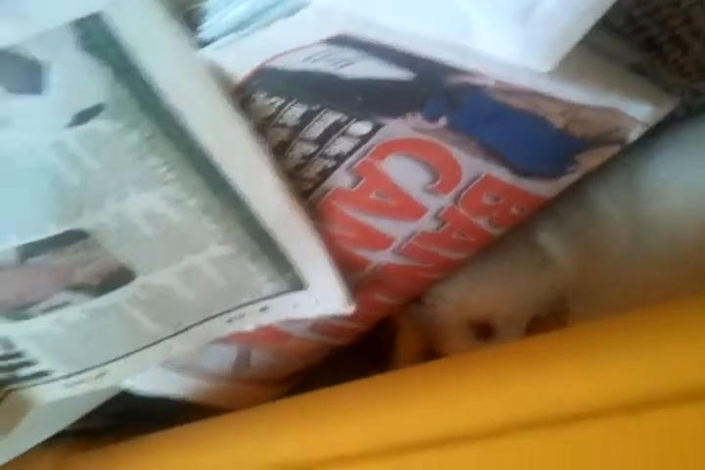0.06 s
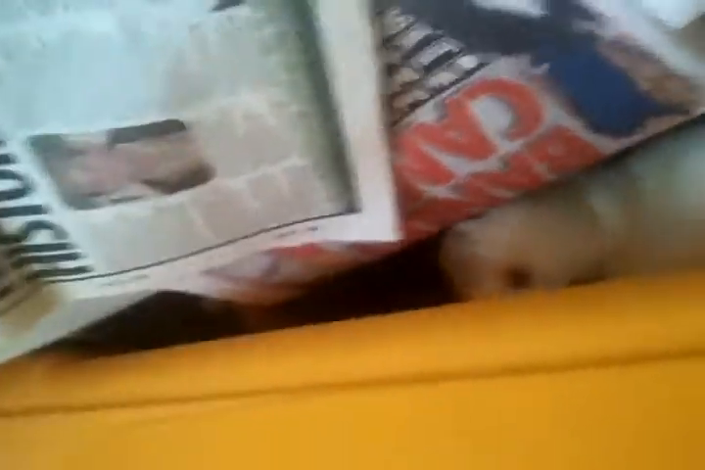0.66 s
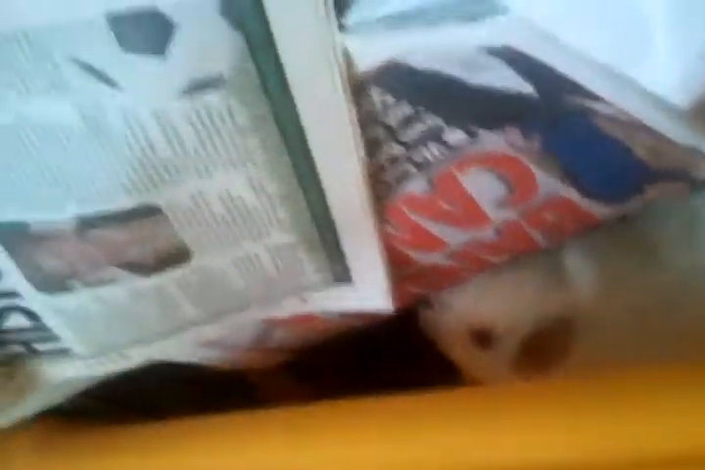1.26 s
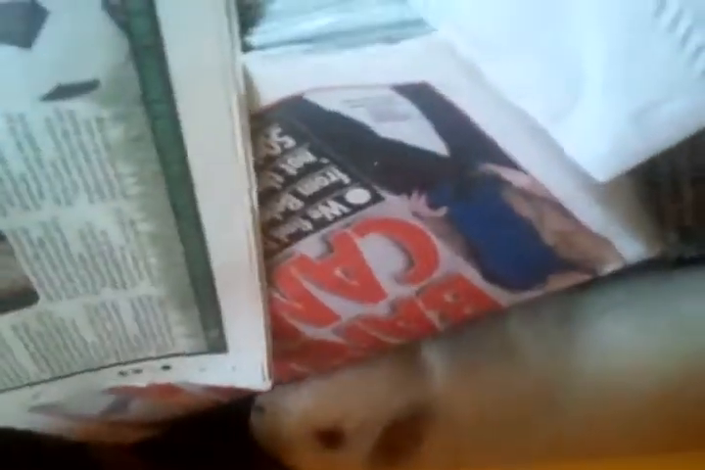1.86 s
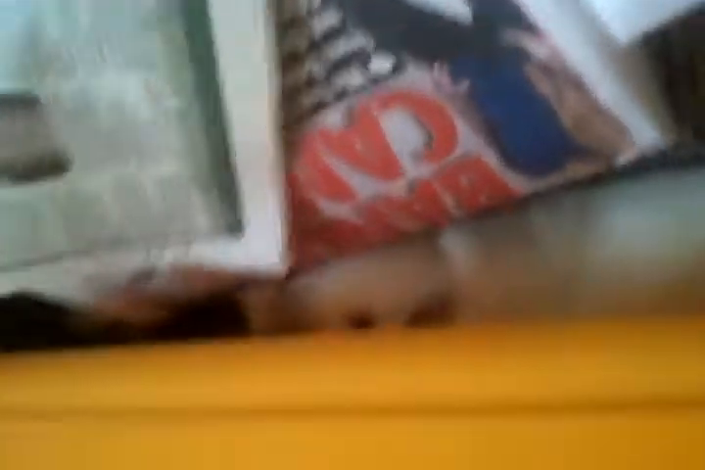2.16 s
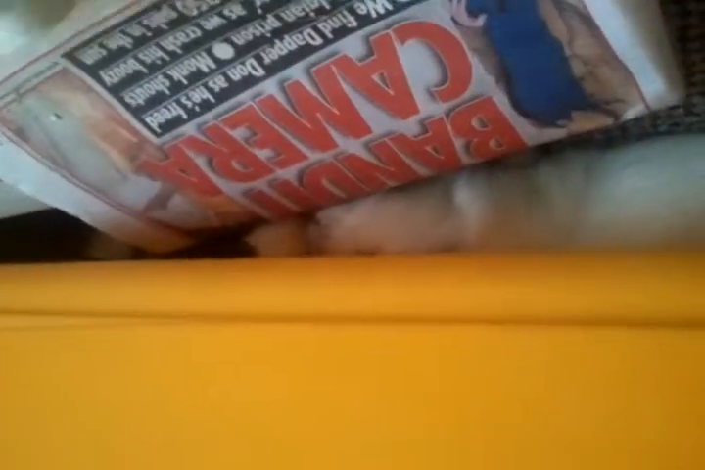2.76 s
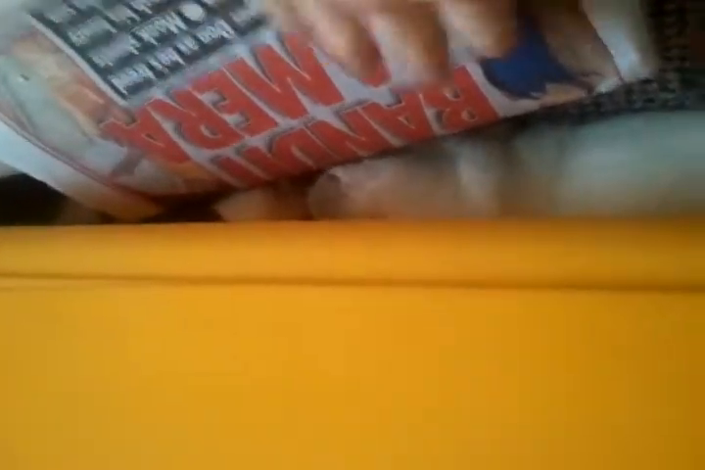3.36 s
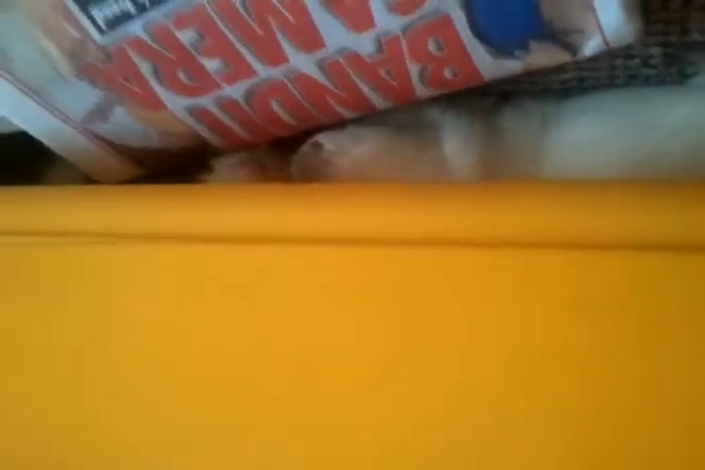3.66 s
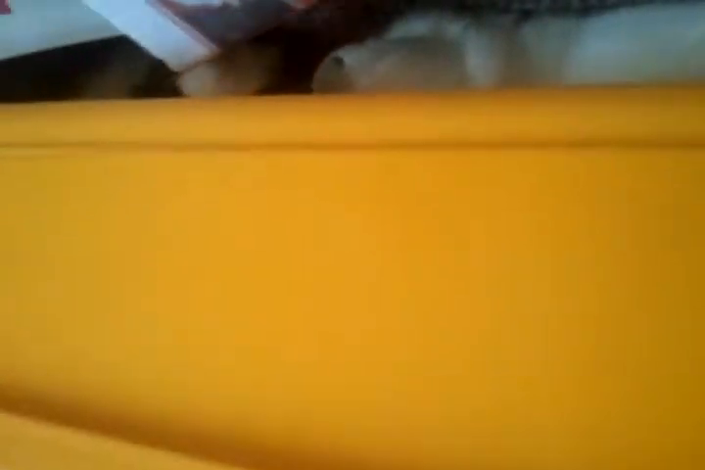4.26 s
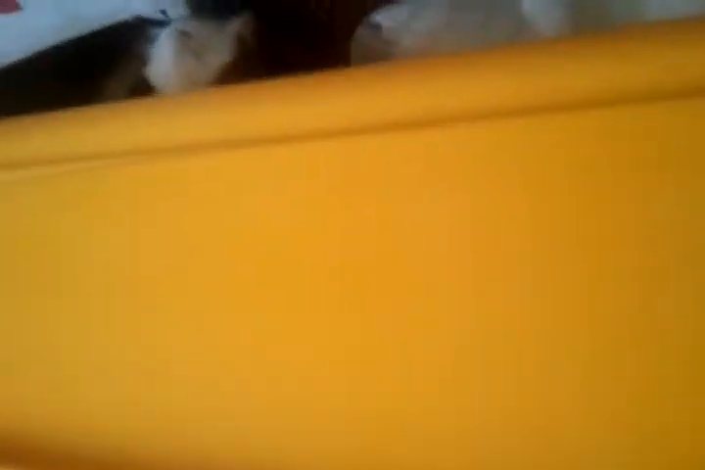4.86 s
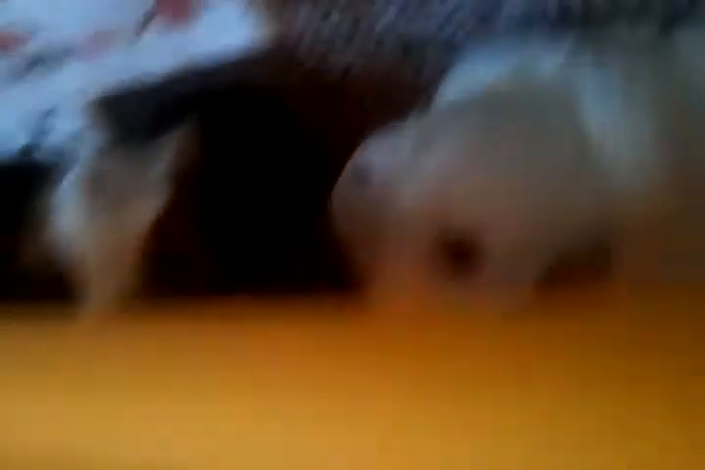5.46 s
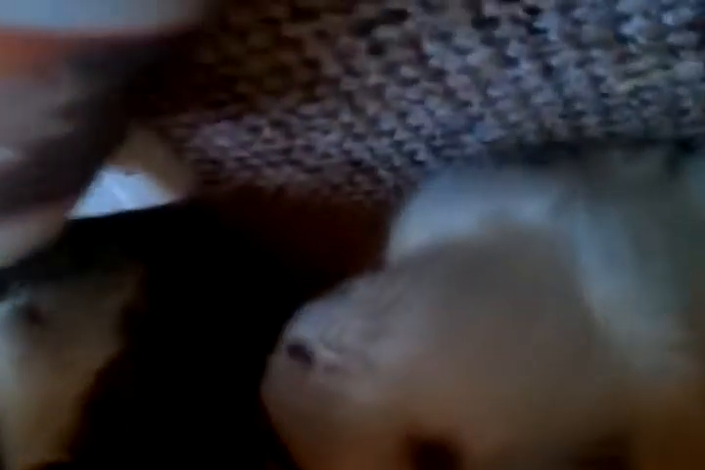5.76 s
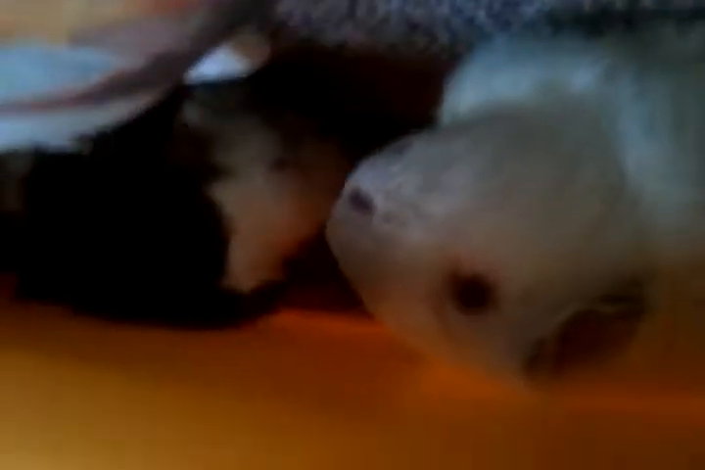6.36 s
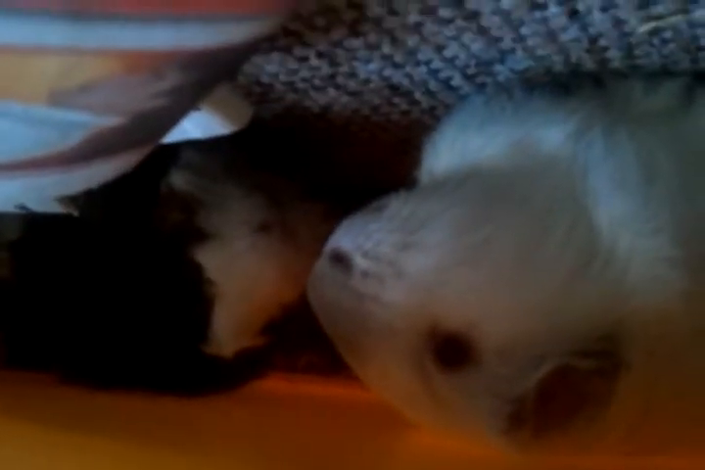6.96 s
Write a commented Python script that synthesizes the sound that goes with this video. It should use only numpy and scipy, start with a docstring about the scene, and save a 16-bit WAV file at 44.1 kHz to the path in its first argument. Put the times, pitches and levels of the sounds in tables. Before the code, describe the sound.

Newspaper rustles softly close to the microphone in a small, quiet room with a faint hum and hiss. The pages are dragged in uneven pulls, sheet sliding over sheet with a bright hiss, dotted with small pops and crease snaps. The rustling grows louder and crunchier, then a page briefly crumples with a few dull thuds from a sofa cushion, and everything settles.

```python
"""Newspaper rustles softly, close to the microphone, over the faint hum and hiss of a small room.
The top pages are being slowly dragged off guinea pigs that shelter under them on a sofa.
Sheet slides on sheet with a bright hiss, slack panels pop over, edges judder, folds crunch,
creases snap and the cushion gives a few dull thuds. Near the end a page crumples, then all settles."""
import sys
import numpy as np
from scipy import signal
from scipy.fft import rfft, irfft
from scipy.io import wavfile

SR = 44100
rng = np.random.default_rng(int(sys.argv[2]) if len(sys.argv) > 2 else 0)


def log_audio(samples):
    """Write samples as a 16-bit WAV file to the path given in sys.argv[1]."""
    # one column per channel
    frames = np.atleast_2d(samples).T
    # limit to full scale, then quantise
    limited = np.clip(frames, -1, 1)
    pcm = np.round(limited * 32767).astype(np.int16)
    wavfile.write(sys.argv[1], SR, pcm)


N = 318477
TIME = np.arange(N) / SR


def from_db(db):
    return 10 ** (np.asarray(db) / 20)


def rms_one(x):
    return x / np.sqrt(np.mean(x ** 2) + 1e-20)


def peak_one(x):
    return x / (np.abs(x).max() + 1e-20)


def butterworth(x, order, hz, kind="low"):
    return signal.sosfilt(signal.butter(order, hz, kind, fs=SR, output="sos"), x)


def add(out, s, sound):
    """Mix a short sound in at s seconds."""
    at = max(round(s * SR), 0)
    out[at:at + len(sound)] += sound[:max(N - at, 0)]


def drift(rate_hz):
    """A slow random wander of spread 1."""
    step, warm_up = 40, 2000
    r = np.exp(-2 * np.pi * rate_hz * step / SR)
    noise = rng.standard_normal(N // step + warm_up + 2)
    slow = signal.lfilter([1], [1, -2 * r, r * r], noise)[warm_up:]
    return np.interp(np.arange(N) / step, np.arange(len(slow)), rms_one(slow))


def coloured(x, spectrum):
    """Shape a steady sound by (Hz, dB) points, falling 41 dB an octave beyond them; rms 1."""
    hz, db = np.transpose(spectrum)
    octave, points = np.log2(np.arange(N // 2 + 1) * SR / N + 1), np.log2(hz)
    outside = np.abs(octave - np.clip(octave, points[0], points[-1]))
    gain = from_db(np.interp(octave, points, db) - 41 * outside)
    return rms_one(irfft(rfft(x) * gain, N))


def resonance(x, hz, width_hz):
    """One resonance of the sheet, gain 1 at its peak."""
    r = np.exp(-np.pi * width_hz / SR)
    feedback = [1, -2 * r * np.cos(2 * np.pi * hz / SR), r * r]
    return signal.lfilter(np.array([1, 0, -1]) * (1 - r * r) / 2, feedback, x)


def slips(per_s, spread_db):
    """Fibres catch and let go at random: many small clicks, a few large; rms 1."""
    sizes = from_db(spread_db * np.minimum(rng.exponential(1, N), 5))
    signs = rng.choice([-1, 1], N)
    return rms_one(sizes * signs * (rng.random(N) < per_s / SR))


def clusters(rows, clicks, relative_width):
    """Each cluster of slips swells and fades, ringing in one resonance of the paper."""
    out = np.zeros(N)
    for middle, db, half_length, hz in rows:
        near = np.abs(TIME - middle) < half_length
        swell = np.cos(np.pi / 2 * (TIME[near] - middle) / half_length) ** 2
        width_hz = relative_width * hz
        ringing = resonance(resonance(clicks[near], hz, width_hz), hz, width_hz)
        out[near] += from_db(db) * rms_one(ringing * swell) * np.sqrt(np.mean(swell ** 2))
    return out


def room_tone(hiss_db=-57):
    """The small room behind the sofa: even hiss and a few slightly unsteady hum lines."""
    # tones of the hum: (frequency [Hz], rms level [dB])
    hum_lines = [(91.5, -68), (823.6, -68.5), (1254, -81.5), (1378, -72.5), (2094, -70.5), (2169, -93)]
    # colour of the room's hiss: (frequency [Hz], relative level [dB])
    spectrum = [(55, -15), (110, -2), (200, 2), (320, 0.5), (550, -4.5), (850, -6.5), (1400, -6),
                (2150, -9), (2800, -12), (4500, -15.5), (7000, -21.5), (9000, -38)]
    hum = np.zeros(N)
    for hz, db in hum_lines:
        phase = 2 * np.pi * hz * TIME + hz / 600 * drift(3.7)
        hum += from_db(db) * np.sqrt(2) * np.sin(phase)
    return hum + from_db(hiss_db) * coloured(rng.standard_normal(N), spectrum)


def friction_db(layer, release_s=0.076, settle_from_s=6.44, settle_db_per_s=12.5):
    """Level of one friction layer: each pull speeds up, swells or sags, and runs out."""
    # pulls of sheet over sheet; attack and release each span 20 dB of hiss: (up to speed [s],
    # let go [s], attack [s], hiss [dB], edge rasp [dB], page flutter [dB], swell of the hiss [dB])
    pulls = [(0.21, 0.286, 0.1, -72, -53.5, -52.5, 0), (.49, 0.57, 0.27, -73, -58.5, -55.5, 18),
             (0.617, 0.611, 0.014, -39, -41, -63, -8), (.65, 0.686, .04, -61, -67, -64, -4),
             (.895, 0.894, 0.16, -50, -53.5, -54.5, 11.5), (1.093, 1.325, 0.1, -48.5, -50.5, -52.5, -3.5),
             (1.667, 1.782, 0.13, -45.5, -51.5, -73, -5), (1.923, 1.987, 0.054, -50, -50.5, -47, -1.5),
             (2.03, 2.055, 0.063, -41.5, -45.5, -47, -1.5), (2.13, 2.199, 0.016, -36.5, -43, -47, 3),
             (2.257, 2.351, 0.11, -31, -40, -54, 9), (2.397, 2.52, 0.11, -42.5, -45.5, -51.5, -11.5),
             (2.537, 2.78, 0.16, -30.5, -39, -54.5, 1.5), (2.818, 2.992, 0.075, -34.5, -35.5, -52.5, 1.5),
             (3.518, 3.612, 0.024, -42, -51.5, -55.5, -1.5), (3.778, 3.9, 0.14, -37.5, -44.5, -53.5, -0.5),
             (3.943, 4.457, 0.16, -31, -40.5, -49.5, 2), (4.567, 4.564, 0.066, -32, -39, -44, 0),
             (4.65, 4.742, 0.055, -50.5, -54.5, -78, 10), (4.792, 4.824, 0.044, -32, -42.5, -47, 1),
             (4.996, 5.14, .14, -27.5, -35, -42, 3.5), (5.19, 5.366, 0.12, -27, -33.5, -43, 2.5),
             (5.428, 5.574, 0.031, -34, -37.5, -45.5, -1.5), (5.638, 5.736, 0.043, -27, -38, -41.5, -1.5),
             (5.796, 5.848, .02, -37.5, -40, -48.5, -1.5), (5.91, 6.023, .08, -48, -55.5, -57, -3),
             (6.055, 6.122, 0.052, -51, -44.5, -44, 3), (6.198, 6.368, 0.043, -60, -48.5, -46, 2),
             (6.396, 6.506, 0.046, -63, -59.5, -72, 10), (6.667, 6.697, 0.026, -58, -55.5, -56, 1)]
    column = ("hiss", "rasp", "flutter").index(layer)
    swing_share = (1, 0.67, 0.59)[column]  # of the hiss's swing in dB
    stir_db = (-66, -63, -64.5)[column]  # between pulls the pages keep stirring, until they settle
    power = from_db(stir_db - settle_db_per_s * np.maximum(TIME - settle_from_s, 0)) ** 2
    for start, end, attack, *levels_db, swell_db in pulls:
        near = slice(max(round((start - 2 * attack) * SR), 0), round((end + .5) * SR))
        t = TIME[near]
        progress = np.clip((t - start) / max(end - start, .005), 0, 1)
        slowed = np.maximum(start - t, 0) / attack + np.maximum(t - end, 0) / release_s
        speed_db = swell_db * (progress - .5) - 20 * slowed
        power[near] += from_db(levels_db[column] + swing_share * speed_db) ** 2
    return 10 * np.log10(power)


def between_sheets(x):
    """The thin gap between the sheets rings with the hiss and shifts as they move; rms 1."""
    # ringing band of the gap: (time [s], centre [Hz], width [Hz])
    gap_band = [(0, 5470, 3350), (1.8, 5770, 3250), (2.2, 5170, 1146), (2.55, 5520, 2180),
                (3.0, 5600, 2630), (3.55, 5800, 2090), (3.95, 5350, 2130), (4.35, 5870, 2210),
                (5.1, 6040, 2700), (5.33, 5660, 2000), (5.64, 5150, 2500), (6.2, 5150, 3550)]
    hz, times, frames = signal.stft(x, SR, nperseg=512)
    s, centres, widths = np.transpose(gap_band)
    centre, width = np.interp(times, s, centres), np.interp(times, s, widths)
    off_centre = np.abs(2 * (hz[:, None] - centre) / width)
    gain = 1 / np.sqrt(width * (1 + off_centre ** 6))
    return rms_one(signal.istft(frames * gain, SR)[1][:N])


def sliding(hiss_gain_db=-0.74, rasp_gain_db=3.5, flutter_gain_db=-0.96, ring_db=-11):
    """Dense slips make the hiss; sparser ones rasp at the edges, ring in the sheet and shake the page."""
    # colour of the rubbing edges: (frequency [Hz], relative level [dB])
    rasp_spectrum = [(700, -10), (1050, -4), (1400, -4), (2200, 0.5), (2650, -2.5), (3100, 1), (4000, 0),
                     (5500, 3), (7200, 0), (9000, 1)]
    # colour of the shaking page: (frequency [Hz], relative level [dB])
    flutter_spectrum = [(71, -63.5), (120, -37.5), (162, -6.5), (300, -2.5), (379, -5.5), (527, 3),
                        (628, 1), (1400, -3.5), (1820, -41), (3080, -120)]
    wavering_grip = from_db(drift(14))
    rubbing = between_sheets(slips(per_s=18000, spread_db=2.5))
    ring = rms_one(resonance(slips(per_s=5000, spread_db=4.5), hz=2720, width_hz=450))
    edges = coloured(slips(per_s=7000, spread_db=3.0), rasp_spectrum)
    shaking = coloured(slips(per_s=2500, spread_db=3.5), flutter_spectrum)
    hiss = from_db(friction_db("hiss") + hiss_gain_db) * rubbing
    rasp = from_db(friction_db("rasp") + rasp_gain_db) * (edges + from_db(ring_db) * ring)
    flutter = from_db(friction_db("flutter") + flutter_gain_db) * shaking
    return (hiss + rasp + flutter) * wavering_grip


def crinkles(gain_db=1, rasp_share=0.71, crumple_s=(6, 6.43), crumple_db=2.5, pitches=12):
    """Small wrinkles give way one by one at scattered pitches, louder when the edges rub harder."""
    crumpling = (TIME > crumple_s[0]) & (TIME < crumple_s[1])  # the page folds up: faster and louder
    per_s = np.where(crumpling, 150, 50)
    size_db = rng.uniform(-4, 4, N)
    level_db = gain_db + rasp_share * friction_db("rasp") + crumple_db * crumpling + size_db
    clicks = from_db(level_db) * rng.choice([-1, 1], N) * (rng.random(N) < per_s / SR)
    pitch_index, out = rng.integers(0, pitches, N), np.zeros(N)
    for k, hz in enumerate(np.geomspace(1500, 6800, pitches)):
        ticks = resonance(clicks * (pitch_index == k) + 1e-18, hz, width_hz=hz)
        out += ticks * SR / (2 * np.pi * hz)  # keeps low and high ticks of like height
    return out


def panel_pops(rattle=0.052, rattle_t60=.025, soft_hz=2100, sway_hz=190, gain_db=3.0):
    """A slack panel flips: a damped swing, a knock from its stiff edge, a page sway, a short rattle."""
    # panels popping over: (time [s], relative peak [dB], pitch [Hz], ring t60 [s], edge share [dB])
    pops = [(.073, -34, 360, 0.032, -12), (.095, -38, 326, 0.013, -13), (.173, -22, 610, 0.011, -2),
            (.577, -22.5, 576, .012, -4.5), (.89, -33, 418, .014, 5.5), (1.184, -39, 337, .014, 8),
            (1.299, -36, 1140, .008, -2), (1.322, -35.5, 1490, .007, -9), (1.932, -30, 590, 0.017, -14),
            (1.954, -35, 540, .011, -4), (2.098, -17, 630, 0.012, -33), (2.168, -28, 670, .012, -3),
            (2.199, -28, 566, .01, -13), (2.337, -21, 443, 0.0085, -11), (2.382, -29, 1190, 0.0089, -6),
            (3.714, -38, 640, .021, -15), (3.737, -30.5, 606, .012, 8), (3.791, -29, 600, 0.012, -4),
            (3.943, -31, 735, 0.017, 1.5), (4.114, -26.5, 596, 0.018, -11), (4.326, -35, 1320, .013, -7),
            (4.844, -34.5, 644, 0.018, -11.5), (5.03, -16.5, 766, 0.011, -19), (5.428, -22, 542, 0.05, -25),
            (5.654, -26, 541, 0.042, -15), (5.948, -36.5, 517, 0.022, -6), (6.135, -12, 301, 0.0042, 4),
            (6.221, -31, 492, .018, -16), (6.283, -8.5, 324, 0.01, -32), (6.522, -25.5, 584, 0.0059, -4),
            (6.723, -30.5, 1140, 0.0057, -7)]
    out, t = np.zeros(N), TIME[:SR // 8]
    for s, db, hz, t60, edge_db in pops:
        push = rattle * rng.standard_normal(len(t)) * from_db(-60 * t / rattle_t60)
        push[0] += 1
        swing = resonance(push, hz, width_hz=np.log(1000) / np.pi / t60)
        swing = butterworth(swing, 2, min(3 * hz, soft_hz))  # a large panel starts slowly
        edge = butterworth(resonance(push, hz=1750, width_hz=800), 6, soft_hz)
        sway = resonance(resonance(push, sway_hz, width_hz=150), sway_hz, width_hz=2 * sway_hz)
        sway_db = -20 + 5.5 * np.log2(600 / hz)  # larger, lower panels rock the page more
        pop = peak_one(swing) + from_db(edge_db) * peak_one(edge) + from_db(sway_db) * peak_one(sway)
        add(out, s + 0.000875, from_db(db + gain_db) * peak_one(pop))
    return out


def edge_judders():
    """A page edge catches and slips as it is pushed along, in short low bursts."""
    # bursts of judder: (middle [s], level [dB], half-length [s], pitch [Hz])
    judders = [(.1, -42.5, 0.0093, 850), (.108, -41.5, 0.019, 246), (.184, -37, .012, 870),
               (.21, -46.5, 0.044, 204), (.27, -44, 0.0081, 238), (.5, -54, 0.12, 365),
               (.855, -50, 0.038, 258), (1.92, -48, 0.034, 272), (1.93, -44, 0.072, 616),
               (2.0, -46.5, 0.063, 570), (2.18, -45.5, 0.03, 212), (5.45, -42, 0.059, 474),
               (6.38, -48, 0.086, 746)]
    return clusters(judders, slips(per_s=810, spread_db=4.0), relative_width=0.37)


def fold_crunches():
    """A fold gives way in a bright cluster of tiny buckles."""
    # folds giving way: (middle [s], level [dB], half-length [s], pitch [Hz])
    crunches = [(.574, -41, 0.016, 5450), (2.352, -40, 0.024, 5100), (3.53, -37, 0.015, 5740),
                (5.274, -22, 0.0046, 3370), (5.498, -23.5, 0.0094, 4700), (5.564, -26.5, 0.035, 5000),
                (5.632, -27, 0.029, 4330), (5.662, -26, 0.022, 4550), (5.718, -23.5, 0.016, 5200),
                (5.735, -19.5, 0.017, 5430), (5.94, -34.5, 0.0085, 3820), (6.305, -37.5, 0.059, 2900),
                (6.34, -33, 0.0069, 3500)]
    return clusters(crunches, slips(per_s=1600, spread_db=4.0), relative_width=0.61)


def crease_snaps(relative_width=0.22, gain_db=-6.0):
    """A crease lets go with one click and a run of buckles that stops within milliseconds."""
    # creases letting go: (time [s], relative level [dB], pitch [Hz], run [s], broad body share [dB])
    snaps = [(0.5738, -27, 2400, 0.004, 18), (1.258, -11, 6300, 0.0011, -10), (1.3216, -26, 6540, 0.002, 1),
             (1.934, -25, 5600, .0018, 4), (2.0981, -5.5, 5640, .0045, -17), (2.169, -18, 4800, .0024, -15),
             (2.3368, -7, 4740, 0.0031, 3), (2.3498, -15.5, 4640, 0.0038, 9),
             (2.381, -12.5, 5300, .0024, 3), (2.394, -15, 5530, .0023, -2), (2.7885, -15, 5340, .002, -16),
             (2.9884, -8, 6000, 0.0014, -9), (3.2833, -30, 2550, 0.0016, -5),
             (3.5236, -21.5, 6060, 0.002, -10), (5.031, -10.5, 6260, 0.0013, -18),
             (5.2703, -8.5, 4500, 0.0025, -22), (5.4299, -11, 6250, 0.0017, -19),
             (5.4908, -15, 5640, 0.0023, 5.5), (5.5655, -6, 4100, 0.0018, -4),
             (5.619, -19, 4760, 0.0018, -8), (5.6539, 1.5, 4700, 0.0025, -14),
             (5.701, -17, 5210, 0.0017, -22), (5.7934, -19, 5160, 0.0022, -4),
             (5.9476, -9, 4430, 0.0043, -6), (6.053, -23.5, 3610, 0.0018, 1),
             (6.1358, -12, 1840, 0.0018, 5), (6.195, -24.5, 2500, 0.0018, 7),
             (6.2018, -20.5, 2680, 0.0022, 8), (6.2193, -19, 2880, 0.0024, 2),
             (6.2833, -9.5, 6070, 0.002, -8), (6.341, -16, 2960, .0017, -11),
             (6.5217, -14.5, 1980, .0019, 7), (6.642, -23.5, 2200, 0.0009, 1),
             (6.7224, -23, 6600, 0.0013, -2), (6.781, -31.5, 2560, 0.0019, -1),
             (6.9849, -30.5, 2470, 0.0023, 17)]
    out, t = np.zeros(N), TIME[:SR // 20]
    for s, db, hz, run, body_db in snaps:
        fade = np.exp(-(t / run) ** 2)
        buckles = rng.standard_normal(len(t)) * fade
        buckles[0] += 4  # the opening click
        ring = rms_one(resonance(buckles, hz, relative_width * hz))
        body = rms_one(resonance(buckles, hz=1500, width_hz=5700))
        crack = rms_one(ring + from_db(body_db) * body) * np.sqrt(np.mean(fade ** 2))
        add(out, s + 0.001054, from_db(db + gain_db) * crack)
    return out


def cushion_bumps(t60_cycles=4.5):
    """The sofa cushion answers a nudge with a dull thud."""
    # soft thuds: (time [s], peak [dB], pitch [Hz])
    bumps = [(0.891, -41, 66), (1.128, -48, 58), (6.137, -33, 100), (6.286, -32.5, 115), (6.524, -45, 90)]
    out, t = np.zeros(N), TIME[:SR // 4]
    for s, db, hz in bumps:
        thud = np.sin(2 * np.pi * hz * t) * from_db(-60 * t * hz / t60_cycles)
        add(out, s, from_db(db) * peak_one(thud))
    return out


def room_tail(x, t60=0.32, wet_db=-24):
    """Soft furniture returns only a faint, short tail to the microphone."""
    t = TIME[:SR // 2]
    tail = rng.standard_normal(len(t)) * from_db(-60 * t / t60) * (t > .004)
    return from_db(wet_db) * signal.fftconvolve(x, tail / np.linalg.norm(tail))[:N]


def scene():
    """Paper and cushion at close range, the quiet room behind them, in mono."""
    rustle = fold_crunches() + edge_judders() + sliding() + crinkles() + crease_snaps() + panel_pops()
    close = butterworth(rustle, 2, 110, "high") + cushion_bumps()  # thin paper radiates no bass
    return (close + room_tail(close) + room_tone())[None]


def record(dry, top_hz=7150, shelf_db=-22, cutoff_hz=8900):
    """A narrow-band microphone: rounded peaks, no deep bass, a steep top with a faint shelf beyond."""
    rounded = .75 * np.tanh(dry / .75)
    body = butterworth(rounded, 2, 45, "high")
    dull = butterworth(body, 16, top_hz) + from_db(shelf_db) * body
    return signal.sosfilt(signal.ellip(10, .3, 80, cutoff_hz, fs=SR, output="sos"), dull)


dry = scene()
out = record(dry)
log_audio(out)
```